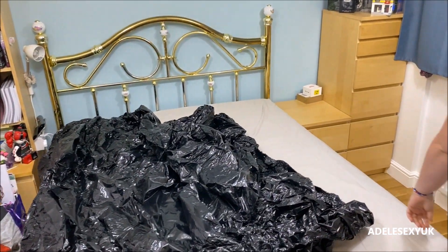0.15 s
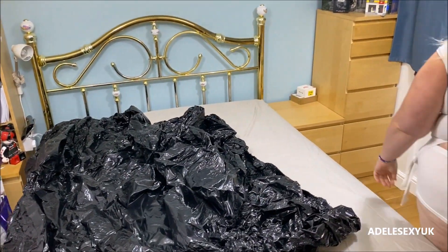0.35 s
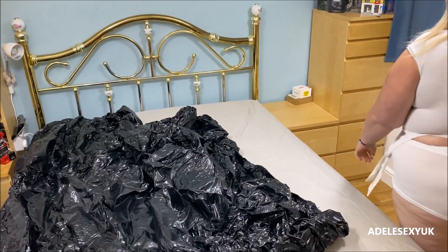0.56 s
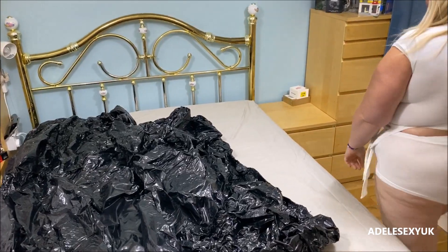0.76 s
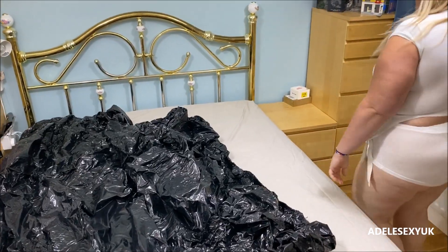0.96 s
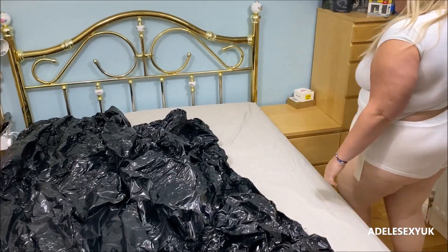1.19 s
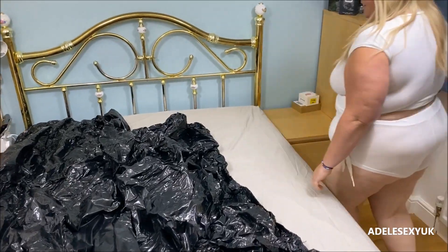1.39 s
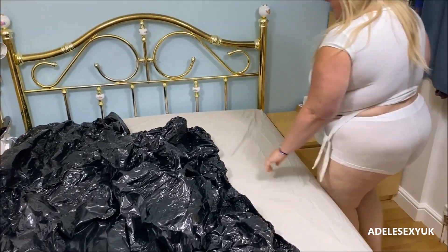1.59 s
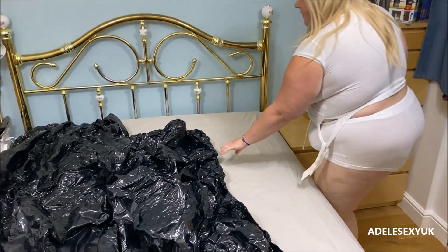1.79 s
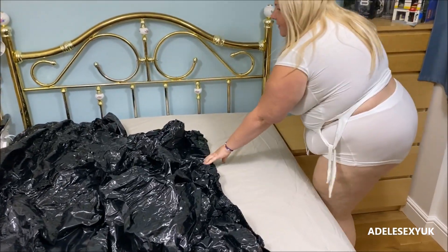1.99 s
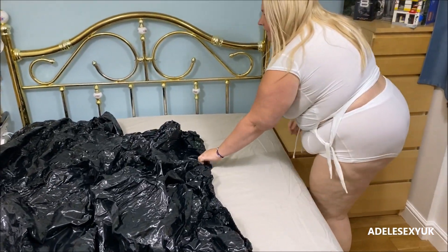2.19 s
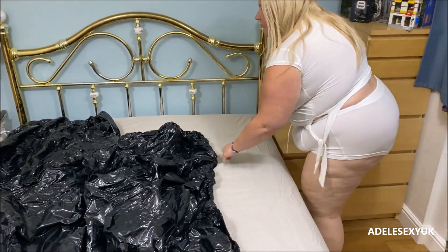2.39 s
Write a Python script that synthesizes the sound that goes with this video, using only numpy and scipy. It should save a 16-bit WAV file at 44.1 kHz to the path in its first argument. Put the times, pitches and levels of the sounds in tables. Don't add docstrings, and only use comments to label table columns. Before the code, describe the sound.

Stiff plastic sheeting crackles in a small furnished bedroom, heard a few metres off. A faint barefoot step and a small crinkle at 0.1 s lead to two loud, sharp snaps at 0.3 and 0.35 s, with hollow wooden knocks and heavy floor thuds. Quieter ticks, knocks and steps follow, notably at 0.8 s, thinning until about 2.1 s. From 2.2 s plastic and cloth rustle again over faint low hum.

```python
import sys
import numpy as np
from scipy import signal
from scipy.fft import rfft, irfft, next_fast_len
from scipy.io import wavfile
from scipy.ndimage import uniform_filter1d

SR = 44100
rng = np.random.default_rng(int(sys.argv[2]) if len(sys.argv) > 2 else 0)


def generate_wav(signal):
    frames = np.transpose(np.atleast_2d(signal))
    scaled = np.clip(frames, -1, 1) * 32767
    pcm = np.round(scaled).astype(np.int16)
    wavfile.write(sys.argv[1], SR, pcm)


def volts_from_decibels(level):
    exponent = np.asarray(level, float) / 20
    return 10 ** exponent


N = 108045
T = np.arange(N) / SR
SIZE = next_fast_len(N + 8192)
F = np.maximum(np.fft.rfftfreq(SIZE, 1 / SR), 1)
OCTAVES_HZ = 250 * 2. ** np.arange(7)


def read(table, hz):
    table_hz, value = np.array(table).T
    return np.interp(np.log(hz), np.log(table_hz), value)


def shape(x, gain):
    return irfft(rfft(x, SIZE) * gain, SIZE)[..., :N]


def unit(x):
    return x / np.sqrt(np.mean(x ** 2))


def octave(hz):
    distance_oct = np.abs(np.log2(np.clip(F, 250, 16000) / hz))
    return np.maximum(1 - distance_oct, 0)


def coloured(x, table, gains):
    x = unit(shape(x, volts_from_decibels(read(table, F))))
    return sum(g * shape(x, octave(hz)) for hz, g in zip(OCTAVES_HZ, gains))


def near_pitch(hz):
    width_oct = 0.86
    return np.exp(-(np.log2(OCTAVES_HZ / hz) / width_oct) ** 2)[:, None]


def decay(start_s, t60_s):
    age = np.maximum(T - start_s, 0)
    return (T >= start_s) * np.exp(-np.log(1000) * age / max(t60_s, .001))


def walk(rate_hz):
    hold = int(SR / rate_hz)
    steps = np.repeat(rng.standard_normal(N // hold + 1), hold)
    smooth = uniform_filter1d(uniform_filter1d(steps, hold), hold)
    return unit(smooth[:N])


def crackle(rate_per_s, spread_db):
    scatter, scatter_hz, scatter_top_hz = 0.68, 616, 7000
    chance, sign, size = rng.random((3, 2, N))
    size_db = np.minimum(-spread_db * np.log(size + 1e-6), 8)
    common, differing = (chance < rate_per_s / SR) * np.sign(sign - .5) * volts_from_decibels(size_db)
    differing = shape(differing, scatter / np.sqrt(1 + (scatter_hz / F) ** 2 + (F / scatter_top_hz) ** 4))
    return unit(np.array([common + differing, common - differing]))


# t/s, flurry level/dB, crease pitch f/Hz, flurry t60/s, crack over flurry/dB
CREASE_SNAPS = [(0.1221, -41.5, 1620, 0.88, 5), (0.3048, -25.5, 4800, 0.16, 11.),
                (0.3534, -25.5, 4500, 0.13, 12.5), (0.5112, -48.5, 980, 0.23, 5),
                (0.5867, -49.5, 1300, 0.2, 7.), (0.6755, -55, 800, 0.18, -4.5),
                (0.757, -56, 3330, 0.61, 10), (0.85, -48, 1280, 0.1, -2), (0.9199, -54, 4070, 0.13, 4),
                (.978, -56, 9000, 0.1, -1), (1.224, -57, 5400, 0.36, 2.), (1.6742, -51.5, 3100, 0.34, 1),
                (1.893, -60, 9000, 0.39, -5), (1.9813, -59.5, 1540, 0.9, -4), (2.093, -46, 1680, 0.071, -5),
                (2.2575, -40, 1900, 0.1, 5.), (2.269, -46.5, 2650, 0.11, 11.5),
                (2.375, -48.5, 900, .4, -15), (2.397, -46.5, 2170, 0.23, -14)]
# f/Hz, level/dB
SHEET_COLOUR = [(180, -28.5), (300, -2.5), (885, -0.5), (1900, -4), (4300, -9), (8000, -12.5), (14500, -18),
                (16000, -23.5)]


def snaps():
    level_db, crease_lift_db, crack_tilt_db_per_oct = -1.5, 7, 1
    crack_rise_s, crack_fall_s, flurry_rise_s = .0012, .0009, .002
    tilt_db = crack_tilt_db_per_oct * np.log2(OCTAVES_HZ / 4000)[:, None]
    crack, flurry = np.zeros((2, len(OCTAVES_HZ), N))
    for s, db, hz, t60_s, crack_db in CREASE_SNAPS:
        gain = volts_from_decibels(db + level_db + crease_lift_db * (near_pitch(hz) - .5))
        span = slice(int(s * SR), int((s + .5) * SR))
        age = np.maximum(T[span] - s, 0)
        rise = np.minimum(age / crack_rise_s, 1) ** 2
        fall = np.exp(-np.maximum(age - crack_rise_s, 0) / crack_fall_s)
        crack[:, span] += gain * volts_from_decibels(crack_db + tilt_db) * rise * fall
        flurry[:, span] += gain * np.minimum(age / flurry_rise_s, 1) * decay(s, t60_s)[span]
    cracks = coloured(np.sign(rng.standard_normal(N)), SHEET_COLOUR, crack)
    return cracks + coloured(crackle(4500, 2.6), SHEET_COLOUR, flurry)


# t/s, level/dB, brightness/(dB per octave), hand rub/dB
HANDLING = [(0, -66.5, 1.5, 5.5), (.117, -57, 2.5, 6), (.124, -53.5, 0., 2), (.29, -48, -1.5, -1.5),
            (.5, -71.5, -2.5, 8), (.72, -76.5, -6, 0.), (.9, -64, -2.5, -8), (1.07, -72.5, -2.5, -7),
            (1.2, -64, -1.5, 0.), (1.36, -70.5, -0.5, 6), (1.58, -59.5, 1., 1.5), (1.74, -69, -1, -12),
            (1.839, -81, 5, -10.5), (1.99, -65.5, -2, 0), (2.2, -55, 0.5, 3.5), (2.34, -54, 1., 1),
            (2.4, -51, -0.5, -1.5), (2.45, -55, 1, 3.)]
# f/Hz, level/dB
RUSTLE_SPECTRUM = [(120, -11.5), (200, -6), (347, -10), (612, -11), (1680, -11.5), (6400, -18),
                   (14500, -28), (16000, -28)]


def rustle():
    rub_hz, flicker_db = 1600, 1.2
    s, *controls = np.array(HANDLING).T
    db, bright, rub_db = (np.interp(T, s, c) for c in controls)
    flicker = walk(24.25) + np.array([walk(14.53) for _ in OCTAVES_HZ])
    tilt_db = bright * np.log2(OCTAVES_HZ / 3000)[:, None]
    gains = volts_from_decibels(db + tilt_db + rub_db * near_pitch(rub_hz) + flicker_db * flicker)
    return coloured(crackle(9000, 2.), RUSTLE_SPECTRUM, gains)


# t/s, level/dB, lowest mode/dB
WOOD_KNOCKS = [(0.126, -48, -24), (0.185, -46.5, -15), (0.229, -42.5, -31), (0.308, -30.5, -1),
               (0.358, -35, -1), (0.618, -47, -33), (0.764, -50.5, -17), (0.855, -52, -17),
               (0.996, -51, -15.5), (1.333, -66, -6), (1.392, -56, -17), (1.57, -50, -20),
               (2.269, -54, -1.5), (2.398, -60, -4)]
# f/Hz, level/dB, t60/s
WOOD_MODES = [(168.4, 1.5, 0.19), (229.4, -3, 0.18), (275.6, -4.5, 0.12), (352.5, -14, 0.15),
              (454, -7, 0.062), (609.4, -10.5, 0.085), (804, -33.5, 0.059)]


def knocks():
    level_db, push_s, lead_s = 4, .0025, .0035
    out = 0
    chance = rng.standard_normal((len(WOOD_KNOCKS), len(WOOD_MODES)))
    for (s, db, deep_db), row in zip(WOOD_KNOCKS, chance):
        start_s = s - lead_s
        age = np.maximum(T - start_s, 0)
        push = 1 - np.exp(-age / push_s)
        for k, (hz, mode_db, t60_s) in enumerate(WOOD_MODES):
            vary_db = deep_db if k == 0 else 0.5 * row[k]
            ring = np.sin(2 * np.pi * hz * (1 + 0.022 * row[k]) * age)
            out = out + volts_from_decibels(db + level_db + mode_db + vary_db) * push * decay(start_s, t60_s) * ring
    return out


# t/s, level/dB, f/Hz
FOOTFALLS = [
    (0.022, -67, 48),
    (0.207, -57, 45.5),
    (0.308, -41, 75.4),
    (0.361, -40.5, 60.5),
    (0.449, -66, 49),
    (0.809, -46.5, 52.7),
    (0.925, -66, 45),
    (1.392, -60, 47.5),
]


def thuds():
    level_db, length_s = 1.5, 0.064
    out = 0
    for s, db, hz in FOOTFALLS:
        age = np.clip((T - s) / length_s, 0, 1)
        swell = np.sin(np.pi * age ** .7) ** 2
        out = out + volts_from_decibels(db + level_db) * swell * np.sin(2 * np.pi * hz * (T - s))
    return out


def wide(gain):
    noise = rng.standard_normal((2, N))
    mid = shape(noise[0], gain)
    side = shape(noise[1], gain * np.clip(F / 340.0, .25, 1))
    return np.array([mid + side, mid - side]) / np.sqrt(np.mean(mid ** 2))


# f/Hz, t60/s
BEDROOM_T60 = [(250, 0.4), (1000, 0.18), (4000, 0.29), (12000, 0.33)]


def room(x):
    level_db, gap_s = -3.5, 0.0033
    noise = wide(np.ones(len(F)))
    tail = sum(shape(noise, octave(hz)) * decay(gap_s, read(BEDROOM_T60, hz)) for hz in OCTAVES_HZ)
    tail = tail[:, :SR // 2]
    tail = tail / np.sqrt(np.sum(tail ** 2) / 2)
    return volts_from_decibels(level_db) * signal.fftconvolve(x, tail, axes=1)[:, :N]


# f/Hz, level/dB
HOUSE_HUM = [(20, -34), (60, -15), (130, -16), (190, -22), (280, -17), (500, -28.5), (3500, -50),
             (16000, -54)]


def house():
    hum_db, drone_db, sway_db = -71, -66, 1.5
    drone_hz, drone_width_hz = 91, 14
    drone = wide(1 / (1 + ((F - drone_hz) / drone_width_hz) ** 4))
    hum = wide(volts_from_decibels(read(HOUSE_HUM, F)))
    return volts_from_decibels(hum_db) * hum + volts_from_decibels(drone_db + sway_db * walk(4.2)) * drone


# f/Hz, left over right/dB
PORT_LEVEL = [(60, 4), (110, -5), (200, 1), (380, -1), (700, -1.5), (1290, -1.5), (2380, 0.5), (4400, 6),
              (8120, 1.5), (15000, -2)]
# f/Hz, left lead/rad
PORT_PHASE = [(100, 0), (950, -1), (2700, 1.5), (4400, 1.38), (8600, 1.34), (16000, 2)]


def scene():
    wood_room, low_side, low_lag_s = .2, .2, .0015
    sheet = snaps() + rustle()
    wood = knocks()
    low = wood + thuds()
    lean = volts_from_decibels(read(PORT_LEVEL, F) / 2) * np.exp(.5j * read(PORT_PHASE, F))
    direct = shape(sheet, np.array([lean, 1 / lean]))
    lagged = low_side * np.roll(low, int(low_lag_s * SR)) * np.array([[1], [-1]])
    return direct + room(sheet + wood_room * wood) + low + lagged + house()


def top_cut(x):
    return signal.sosfilt(signal.butter(12, 16480, fs=SR, output="sos"), x)


def record(dry):
    top_hz = 15750
    db = 0
    for hz, width_hz, peak_db in [(12050, 330, -16), (8200, 900, -4), (15130, 540, 2.5)]:
        db = db + peak_db * np.exp(-((F - hz) / width_hz) ** 2)
    mix = shape(dry, volts_from_decibels(db) / (1 + (F / top_hz) ** 80))
    return top_cut(mix)


dry = scene()
out = record(dry)
generate_wav(out)
```